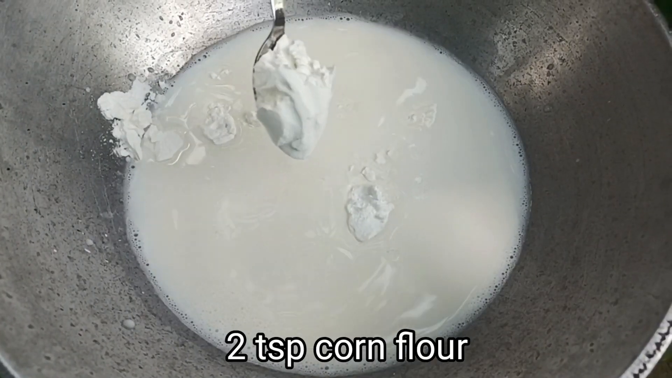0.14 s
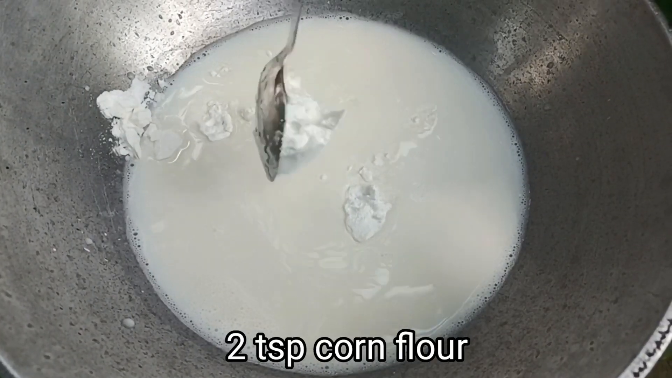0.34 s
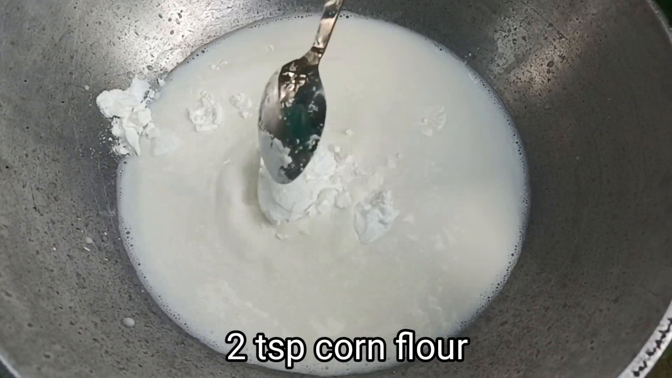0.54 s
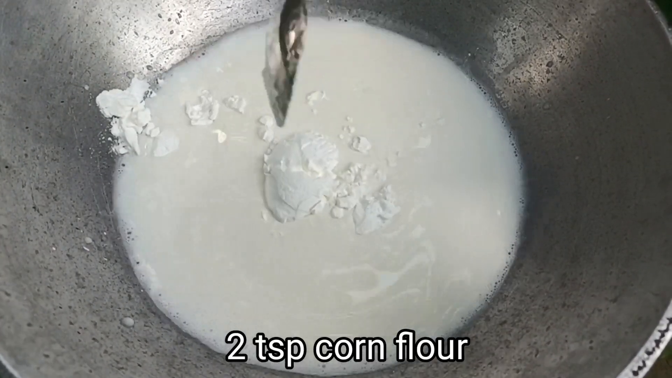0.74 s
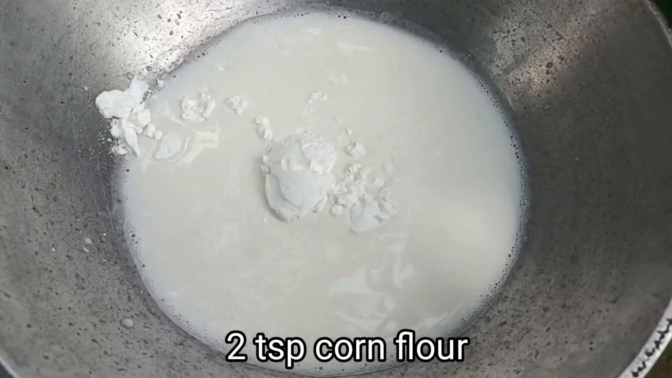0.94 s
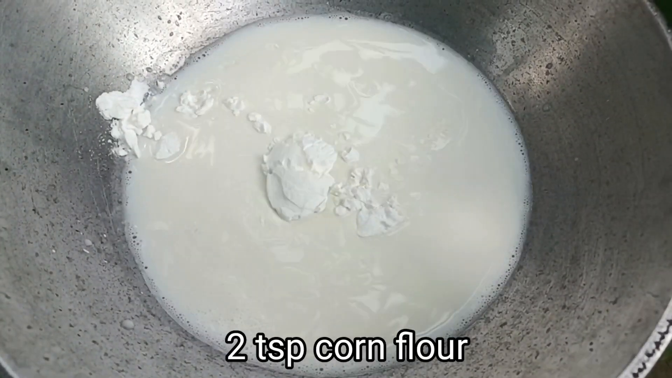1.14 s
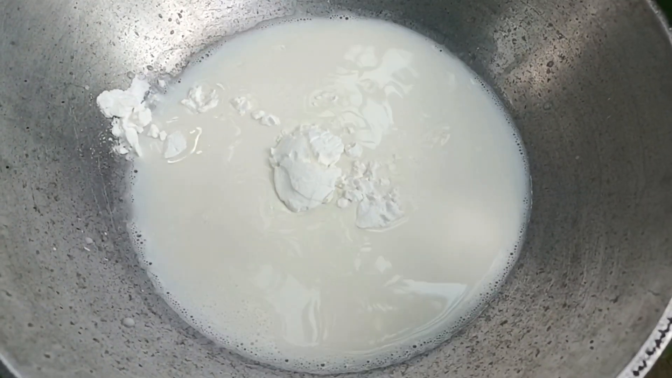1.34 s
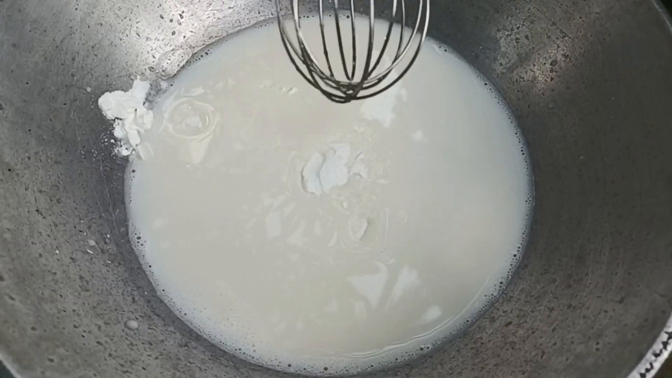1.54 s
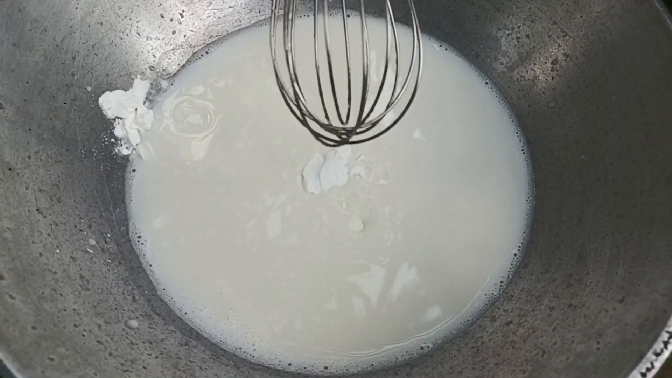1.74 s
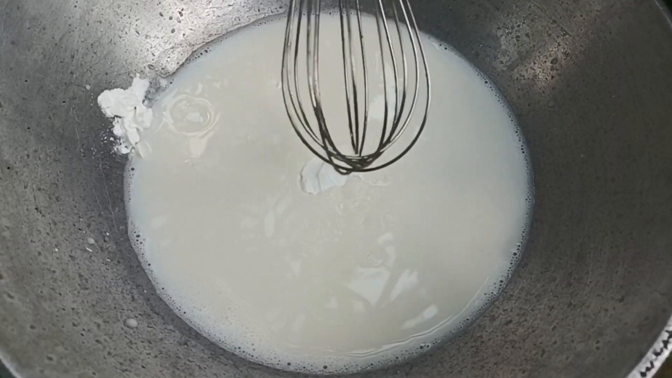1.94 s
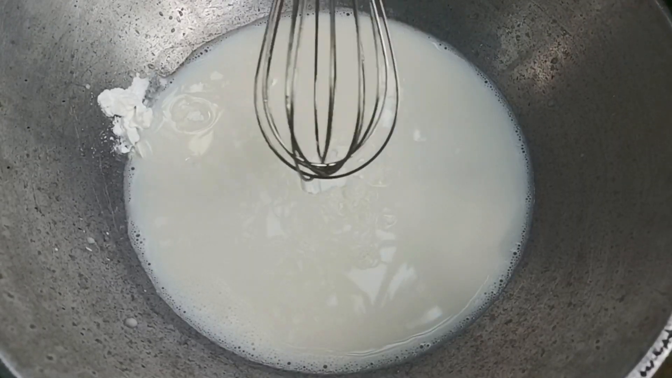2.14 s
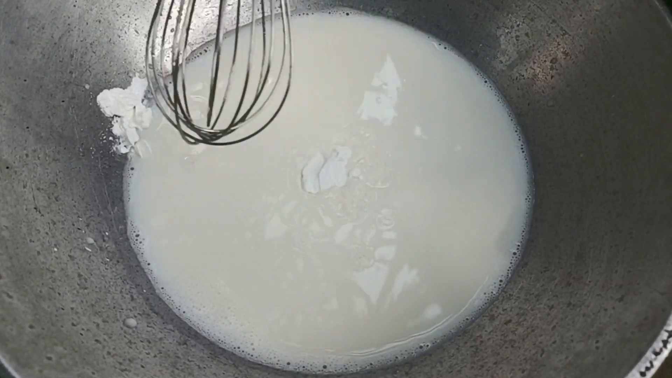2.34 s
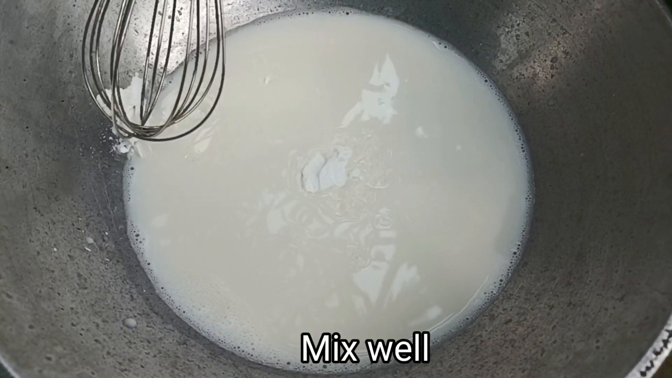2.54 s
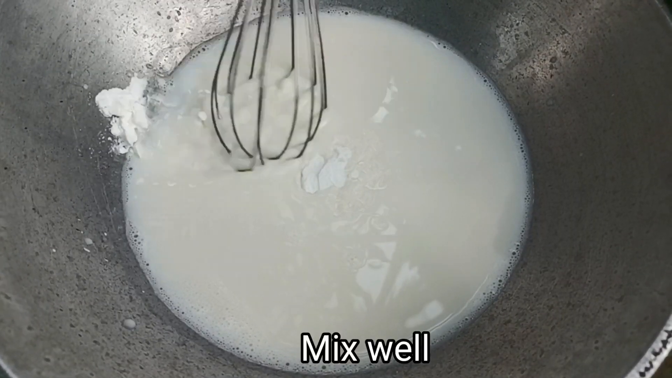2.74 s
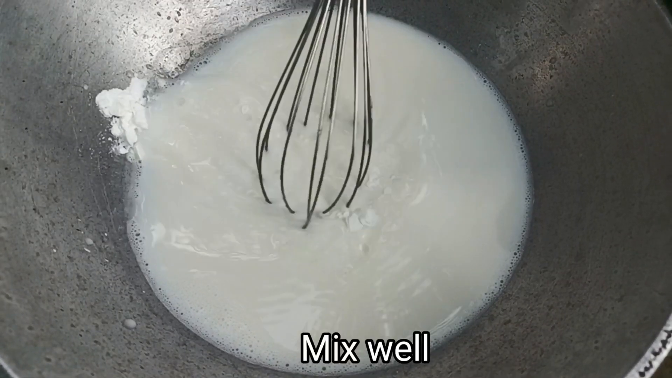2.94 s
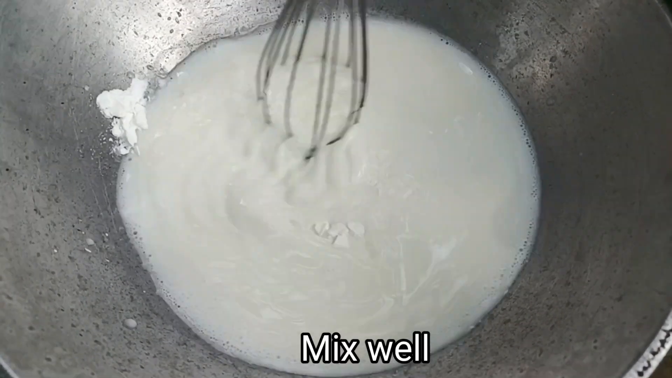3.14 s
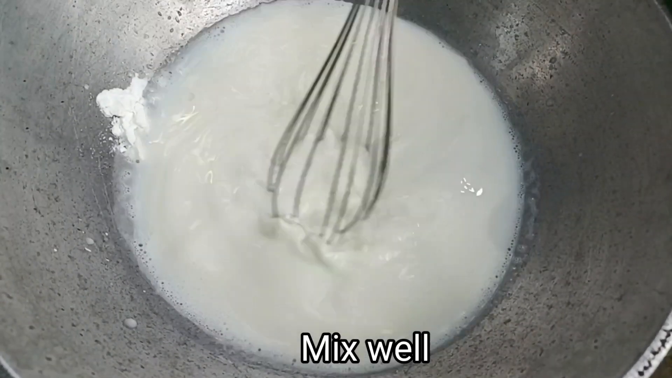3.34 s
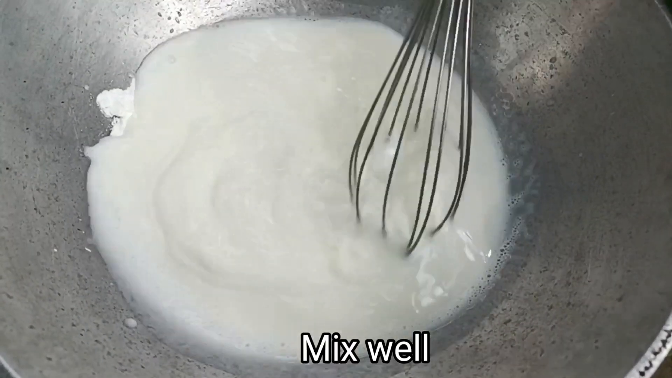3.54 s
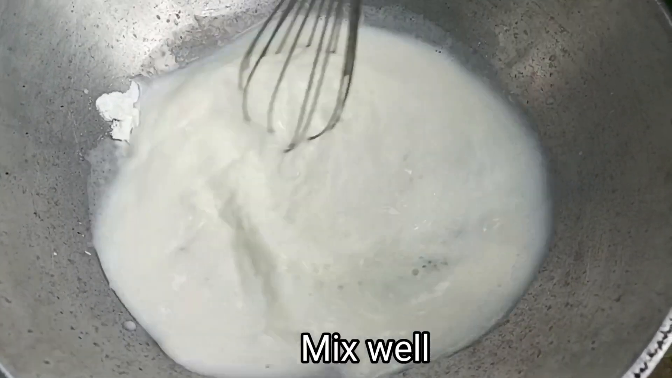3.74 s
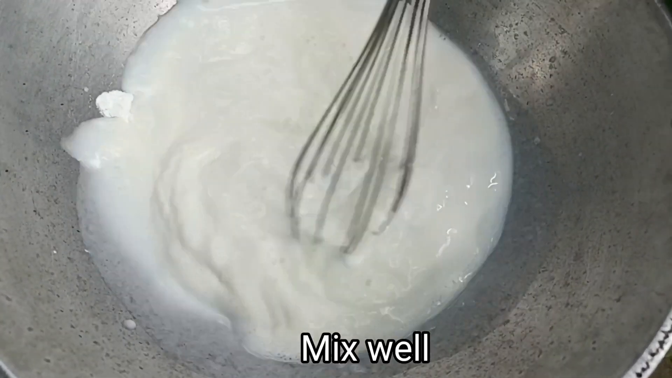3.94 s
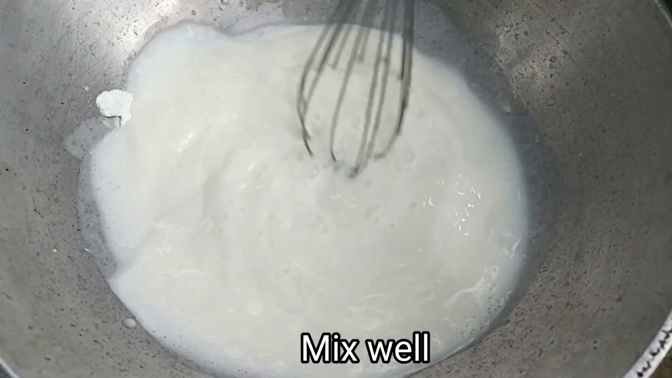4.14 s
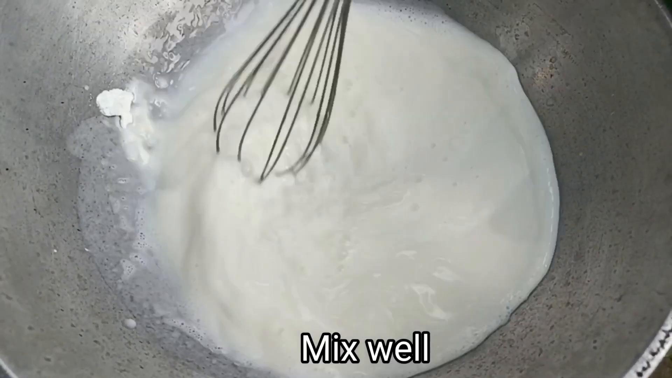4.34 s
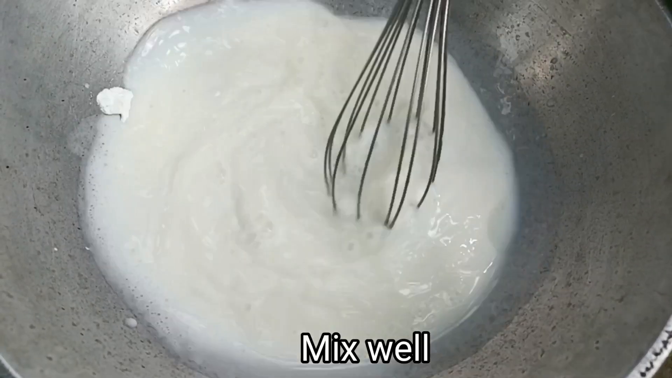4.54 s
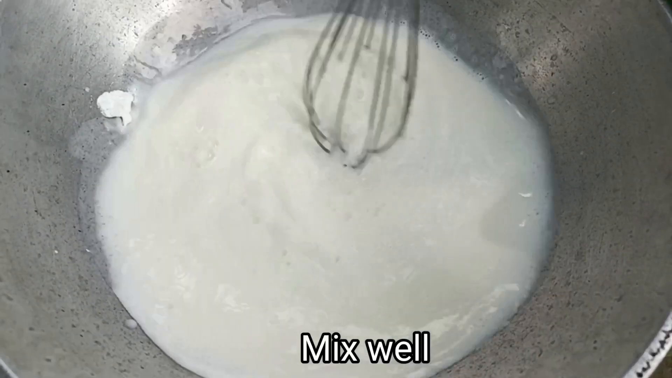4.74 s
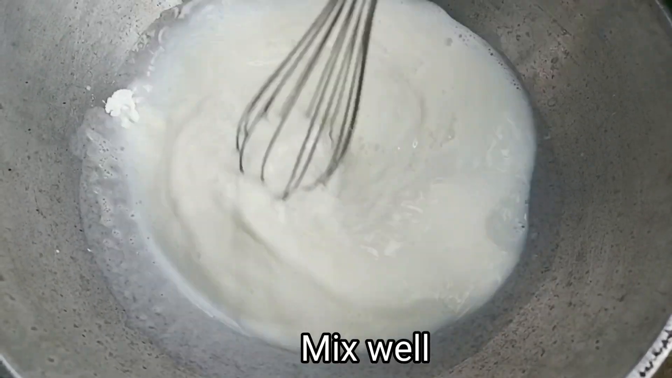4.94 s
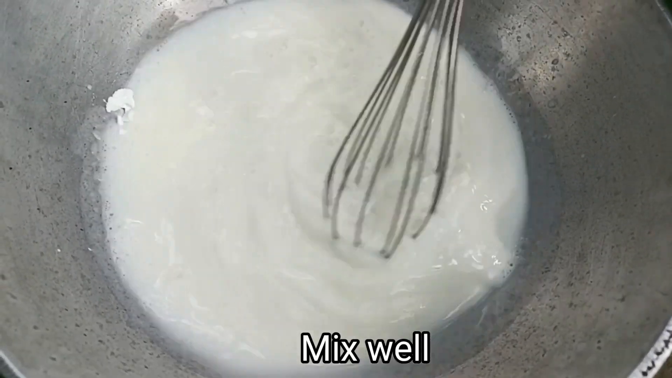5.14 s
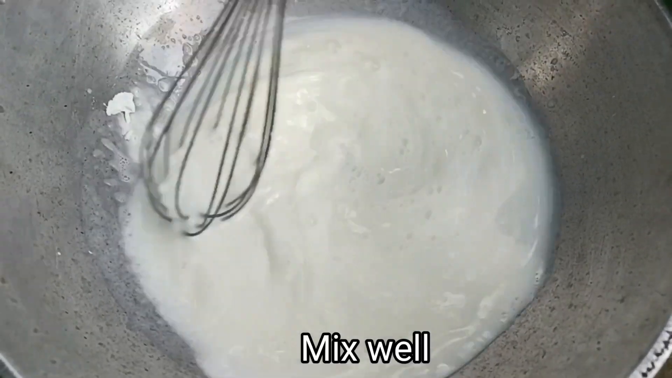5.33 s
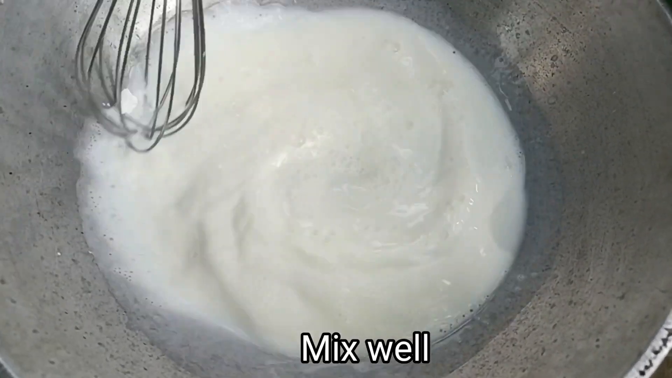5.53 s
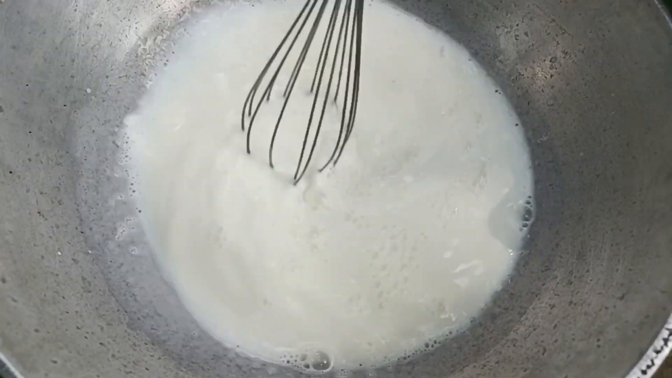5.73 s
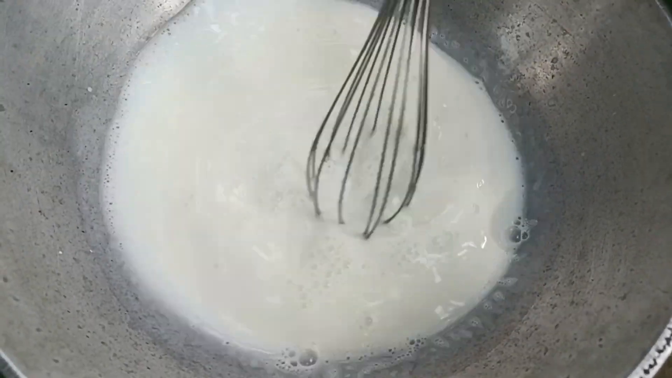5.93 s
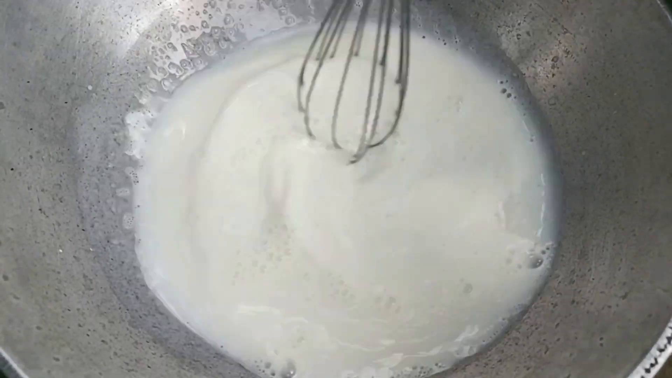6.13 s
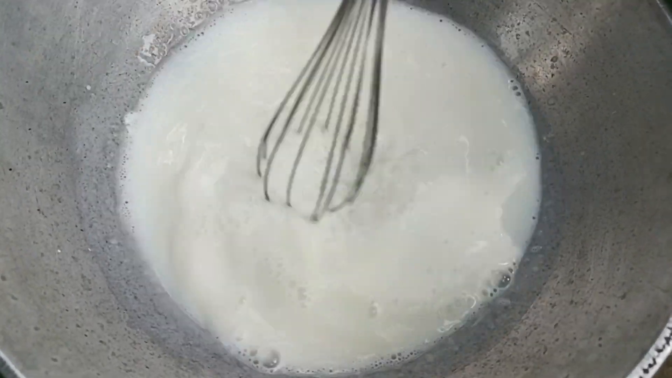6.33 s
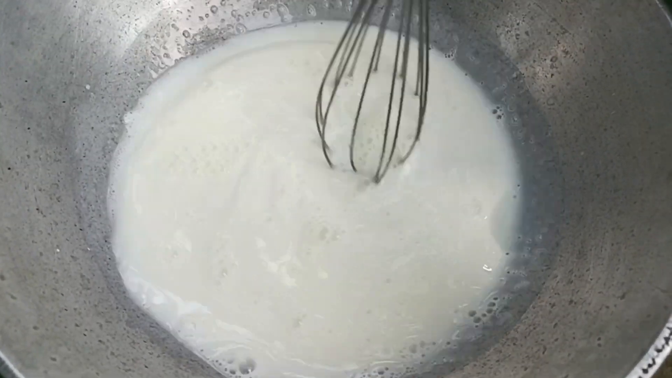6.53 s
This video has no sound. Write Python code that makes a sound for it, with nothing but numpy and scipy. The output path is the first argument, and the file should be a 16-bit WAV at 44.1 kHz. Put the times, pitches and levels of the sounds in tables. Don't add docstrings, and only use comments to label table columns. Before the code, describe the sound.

Quiet open-air ambience with chirring insects and a far crow, followed by fast metallic whisking, ringing steel, small watery gulps and a late dove coo.

```python
import sys
import numpy as np
from scipy import signal
from scipy.io import wavfile
from scipy.ndimage import uniform_filter1d

SR = 44100
rng = np.random.default_rng(int(sys.argv[2]) if len(sys.argv) > 2 else 0)


def nominal_scale(level):
    x = np.asarray(level, float) / 20
    return 10 ** x


def bounce(signal):
    frames = np.transpose(np.atleast_2d(signal))
    limited = np.clip(frames, -1, 1)
    pcm = np.round(limited * 32767).astype(np.int16)
    wavfile.write(sys.argv[1], SR, pcm)


N = 290178
TIME = np.arange(N) / SR

# centre_hz, width_hz, level_db
PAN_MODES = [(1726, 110, -8), (2067, 190.3, -1.5), (2570, 71, 0), (3040, 141, 1.5), (3692, 170, -1.5),
             (4240, 158, -6.5), (4530, 173, -5.5), (4920, 162, -7.5)]
# start_s, drag_db, first_mode_hz
HAND_STROKES = [(2.623, -46, 3260), (2.932, -44.5, 1680), (2.948, -40.5, 4570), (3.002, -34.5, 4600),
                (3.036, -42, 2562), (3.05, -42.5, 4000), (3.112, -44, 5070), (3.264, -45.5, 3790),
                (3.292, -40, 4570), (3.439, -31.0, 2510), (3.467, -38, 2500), (3.489, -39.5, 4450),
                (3.587, -32, 3580), (3.692, -37, 3200), (3.715, -42.5, 2570), (3.764, -44, 2270),
                (3.774, -40.5, 2120), (3.936, -40.5, 3600), (3.948, -28, 3740), (4.022, -36, 3530),
                (4.088, -39, 3550), (4.138, -42, 2310), (4.239, -32, 3657), (4.315, -40.5, 3700),
                (4.464, -38.5, 4560), (4.553, -32, 2775), (4.662, -35.5, 2580), (4.777, -37.5, 4520),
                (4.837, -36, 2810), (4.872, -32, 3692), (4.998, -35, 2535), (5.137, -33, 3564),
                (5.245, -48, 3300), (5.457, -42, 2663), (5.51, -47.5, 2580), (5.562, -47, 4350),
                (5.654, -33.5, 1756), (5.714, -38.5, 3820), (5.765, -39, 2020), (5.83, -44, 2660),
                (5.916, -39.5, 2540), (5.971, -35, 2580), (6.0, -40.5, 3400), (6.078, -39, 2520),
                (6.098, -36.5, 2610), (6.138, -39, 2398), (6.174, -42.5, 3630), (6.231, -40, 2580),
                (6.278, -32.5, 3030), (6.317, -37, 2620), (6.417, -33.5, 3727), (6.46, -38.5, 2590),
                (6.517, -35.5, 2550)]


def rms_one(x):
    return x / np.sqrt(np.mean(x ** 2) + 1e-20)


def in_time(rows):
    s, *columns = np.transpose(rows)
    return [np.interp(TIME, s, c) for c in columns]


def at_hz(points, hz):
    return np.interp(np.log(hz), np.log(np.array(points)[:, 0]), np.array(points)[:, 1])


def drift(rate):
    r = np.exp(-40 * np.pi * rate / SR)
    noise = rng.standard_normal(N // 20 + 2002)
    slow = signal.lfilter([1], [1, -2 * r, r * r], noise)[2000:]
    return np.interp(np.arange(N) / 20, np.arange(len(slow)), rms_one(slow))


def ring(clicks, hz, t60):
    r, w = nominal_scale(-60 / (t60 * SR)), 2 * np.pi * hz / SR
    return signal.lfilter([0, np.sin(w)], [1, -2 * r * np.cos(w), r * r], clicks + 1e-18)


def band(x, low_hz, high_hz):
    return signal.sosfilt(signal.butter(2, [low_hz, high_hz], "band", fs=SR, output="sos"), x)


def hiss(low_hz, high_hz):
    noise = rng.standard_normal((2, N))
    return rms_one(band(band(noise, low_hz, high_hz), low_hz, high_hz))


def grains(per_s, spread_db):
    sizes = nominal_scale(spread_db * np.minimum(rng.exponential(1, N), 5)) * rng.choice([-1, 1], N)
    return sizes * (rng.random(N) < per_s / SR)


def placed(x, pan_db, lag):
    return np.array([x * nominal_scale(pan_db / 2), np.roll(x, int(lag)) * nominal_scale(-pan_db / 2)])


def coloured(white, spectrum, patchy_db, patch_rate, alike):
    octaves = np.log2(spectrum[-1][0] / spectrum[0][0])
    edges = spectrum[0][0] * 2 ** np.arange(0, octaves + .01, 1 / 3)
    out = 0
    for k, (low, high) in enumerate(zip(edges, edges[1:])):
        mid, side = band(white[k % 2], low, high)
        hz = np.sqrt(low * high)
        c = np.clip(alike(hz), -1, 1)
        gain = nominal_scale(at_hz(spectrum, hz) + patchy_db * drift(patch_rate))
        out = out + gain * (np.sqrt(1 + c) * mid + np.sqrt(1 - c) * side * [[1], [-1]])
    return rms_one(out)


def air():
    # pitch_hz, level_db
    air_spectrum = [(55, -13), (120, 0.5), (280, -7), (620, -11), (900, -13), (3000, -10), (4300, -19.5),
                    (5300, -32.5), (6600, -9.5), (8300, -14)]
    # pitch_hz, likeness
    likeness = [(60, 0.44), (240, 0.85), (950, 0.0096), (15000, 0)]
    white = rng.standard_normal((2, 2, N))
    noise = nominal_scale(-71.5) * coloured(white, air_spectrum, 2.5, 4.0, lambda hz: at_hz(likeness, hz))
    return signal.sosfilt(signal.butter(8, 10500, fs=SR, output="sos"), noise)


def insect(per_s, hz, width_hz, noisy, uneven):
    count = np.floor(np.cumsum(per_s * (1 + 0.0073 * drift(2.2))) / SR)
    strokes = np.diff(count, prepend=0) * (1 + uneven * (-1) ** count)
    blur = (signal.lfilter([1], [1, -.994], strokes) + 9.4) * rng.standard_normal((2, N))
    song = rms_one(ring(placed(strokes, 0, 9), hz, .009)) + noisy * rms_one(blur)
    for _ in range(2):
        song = band(song, hz - width_hz, hz + width_hz)
    return rms_one(song)


def insects():
    # time_s, level_db
    trill_levels = [(0, -61), (1.03, -59), (1.05, -67), (1.25, -68.5), (1.7, -61), (2.56, -58.5),
                    (2.58, -67.5), (2.85, -65.5), (3.3, -60.5), (6.58, -60.5)]
    # top_s, level_db
    rasp_swells = [(0, -63.5), (.4, -59), (.72, -65.5), (1.0, -64), (1.41, -67.5), (1.579, -71.5),
                   (1.79, -60), (2.1, -68), (2.366, -69)]
    to_right = nominal_scale([[-2.5], [2.5]])
    trill = nominal_scale(in_time(trill_levels)[0]) * insect(140.8, 9827, 490, noisy=7.1, uneven=0.033)
    chirps_per_s, first_chirp_s = 8.22, .098
    beat = np.cos(2 * np.pi * chirps_per_s * (TIME - first_chirp_s))
    beat = np.clip(1.8 * beat + 1.5, .25, 1)
    chirp = nominal_scale(-63) * beat * insect(125, 8960, 475, noisy=3.7, uneven=0.022)
    sag_db_per_s = 80
    swell_db = np.max([db - sag_db_per_s * np.abs(TIME - s) for s, db in rasp_swells], axis=0)
    rasp = nominal_scale(swell_db + 2.0 * drift(18.0)) * hiss(4950, 5800)
    return (trill + chirp) * to_right + rasp


def call(rows, partials, rough, rough_hz):
    start, end = rows[0][0], rows[-1][0]
    on = (TIME > start - .002) & (TIME < end)
    pitch, level_db = (v[on] for v in in_time(rows))
    edge = np.clip(np.minimum(TIME[on] - start + 0.0039, end - TIME[on]) / 0.009, 0, 1)
    phase = 2 * np.pi * np.cumsum(pitch) / SR
    shake_in, shake_across = rough * drift(rough_hz)[on], rough * drift(rough_hz)[on]
    voice = 0
    for k, db in partials:
        voice = voice + nominal_scale(db) * ((1 + shake_in) * np.sin(k * phase) + shake_across * np.cos(k * phase))
    out = np.zeros(N)
    out[on] = nominal_scale(level_db) * edge * voice * np.sqrt(2 / (1 + 2 * rough ** 2))
    return out


def shaped(s, length, level_db, first_hz, last_hz):
    shape = [(0, 4.5), (0.18, 0), (1 - 0.18, 7.5), (1, 17)]   # (share of the length, dB below the top)
    return [(s + u * length, first_hz + u * (last_hz - first_hz), level_db - db) for u, db in shape]


def birds():
    # time_s, loudest_partial_hz, level_db
    caw = [(0.37, 1370, -67), (.4, 1367, -57), (0.45, 1293, -53), (.54, 1200, -71.5), (0.62, 1180, -83)]
    # multiple of the loudest partial, level_db
    throat = [(.5, -21.5), (1, 7), (1.5, 5.5), (2, 0), (2.4, -3.5), (3, -34)]
    # start_s, length_s, level_db, first_hz, last_hz
    hoarse = [(0.0, .36, -66, 2480, 2260), (.02, .3, -69, 2120, 2000), (2.3, .22, -76, 720, 700),
              (2.52, .2, -72, 740, 720), (0.0, .42, -63.5, 2310, 2140), (.5, .31, -59.5, 2020, 1920),
              (.61, .13, -70, 3100, 3080), (.63, .14, -63, 2460, 2380), (.66, .15, -67, 1510, 1460),
              (.71, .09, -67, 3520, 3460), (.75, .3, -61.5, 2000, 1880), (.8, .08, -75, 4000, 3980),
              (.91, .13, -67, 1550, 1530), (1.08, .15, -75, 3080, 3050), (1.38, .14, -59, 4940, 4770),
              (1.69, .22, -66, 6570, 6450), (1.91, .14, -65, 3110, 3050), (2.18, .1, -68, 3020, 3000),
              (2.16, .08, -69, 1890, 1950), (2.225, .06, -65, 1980, 2260), (2.25, .11, -62, 2700, 2440),
              (2.3, .09, -68, 3110, 3100), (2.335, .06, -66, 1780, 1710), (2.51, .06, -68, 1780, 2050),
              (2.55, .07, -66, 2120, 2260), (2.65, .2, -54, 1900, 1900), (2.71, .17, -57, 2330, 2200),
              (2.66, .21, -64, 1490, 1470), (2.83, .13, -55, 1800, 1640), (5.358, .075, -50, 3150, 3750),
              (5.36, .07, -53, 2800, 3050)]
    # start_s, length_s, level_db, first_hz, last_hz
    clear = [
        (.27, .09, -64, 3580, 3460),
        (1.47, .13, -71, 1212, 1228),
        (2.3, .16, -60, 527, 546),
        (2.55, .48, -61.5, 551, 553),
        (5.24, .18, -63.5, 755, 670),
        (1.7, .12, -68, 6600, 5250),
    ]
    crow = call(caw, throat, rough=1.3, rough_hz=110.0)
    throat_noise = rms_one(band(band(rng.standard_normal(N), 1160, 2900), 1250, 11000))
    opening = np.clip((TIME - .36) / 0.073, 0, 1) * (TIME < .62)
    crow += nominal_scale(in_time(caw)[1] + 4.0) * opening * throat_noise
    others = sum(call(shaped(*row), [(1, 0)], rough=2, rough_hz=65) for row in hoarse)
    others += sum(call(shaped(*row), [(1, 0)], rough=.4, rough_hz=27.0) for row in clear)
    out = placed(others, -7.0, -11) + placed(crow, -0.5, 10.9)
    for delay_s, db, pan_db in [(.023, -4, 4), (.047, -11, 1), (.081, -15.5, 2)]:
        out += nominal_scale(db) * placed(np.roll(others + crow, int(delay_s * SR)), pan_db, 41.9)
    return out


def contacts():
    # start_s, drag_db, mode_hz
    taps = [(2.641, -46, 3270), (2.736, -47, 2240), (2.98, -42.5, 2940), (3.079, -42.5, 2050),
            (3.187, -39.5, 3716), (3.351, -37, 4530), (3.381, -37, 4800), (3.405, -34.5, 3570),
            (3.479, -41, 4930), (3.542, -43.5, 2620), (3.774, -38.5, 2193), (3.829, -36.5, 2170),
            (3.865, -35.5, 4720), (3.884, -38, 3200), (4.053, -31.5, 3030), (4.09, -39.5, 3600),
            (4.707, -28, 3600), (4.782, -31.5, 3150), (5.056, -41, 3800), (5.576, -44, 5400),
            (5.593, -35, 4500), (5.742, -34.5, 3040), (5.83, -38, 2600), (6.436, -31, 3620)]
    # start_s, drag_db
    eases = [(2.653, -58), (2.713, -50), (2.768, -53.5), (2.882, -57), (3.247, -46), (3.323, -39.5),
             (3.522, -43), (3.749, -49), (3.902, -43), (3.982, -39.5), (4.066, -43), (4.121, -50),
             (4.178, -44), (4.209, -37), (4.33, -40), (4.42, -41.5), (4.495, -40), (4.631, -38.5),
             (4.728, -38), (4.811, -41.5), (4.945, -41.5), (4.978, -42), (5.031, -43), (5.091, -42.5),
             (5.124, -40), (5.254, -47), (5.269, -51), (5.319, -55), (5.362, -55), (5.538, -49),
             (5.601, -39), (5.68, -36), (5.787, -42), (5.889, -44.5), (6.028, -49), (6.064, -52),
             (6.193, -47), (6.37, -40.5), (6.493, -43), (6.54, -46.5)]
    # start_s, drag_db, mode_hz
    hard_landings = [(2.615, -39.5, 4220), (3.314, -31.5, 2525), (4.171, -32.5, 3360), (4.203, -33, 2630),
                     (4.394, -37, 2530), (4.968, -37.5, 2090), (5.075, -34, 2530), (5.106, -35.5, 4640),
                     (5.433, -36.5, 4580), (5.587, -41, 4570), (5.752, -30, 3080), (5.956, -31.5, 2580),
                     (6.042, -39.5, 2970), (6.086, -35, 2620), (6.569, -36, 3040)]
    tap_s, hop_s = .01, .05
    held = sorted(HAND_STROKES + hard_landings + [(s, db, 0) for s, db in eases])
    starts = np.transpose(held)[0]
    edges = np.append(starts, [(s, s + tap_s) for s, db, hz in taps])
    hops = np.arange(edges.min(), N / SR, hop_s)
    edges = np.append(edges, hops[np.abs(hops[:, None] - edges).min(axis=1) > hop_s / 3])
    odds = nominal_scale(np.transpose(PAN_MODES)[2])
    family = rng.choice(len(PAN_MODES), 1000, p=odds / odds.sum())
    place = rng.normal(0, .3, 1000)
    out = []
    for t in np.unique(edges[edges < N / SR].round(4)):
        s, db, first_hz = held[max(np.searchsorted(starts, t + 1e-4) - 1, 0)]
        for tap in taps:
            if tap[0] - 1e-4 < t < tap[0] + tap_s - 1e-4:
                s, db, first_hz = tap
        if first_hz > 0 and t < s + 1e-4:
            out.append((t, db, first_hz, db))
        else:
            hz, width = PAN_MODES[family[int(t * 100)]][:2]
            out.append((t, db, hz + width * place[int(t * 100)], db - 8))
    return out


def pressure(held_db):
    bite_db, bite_s, let_go_db_per_s = 3.5, .007, 1400
    landings = np.sort([0] + [row[0] for row in HAND_STROKES])
    age = TIME - landings[np.searchsorted(landings, TIME, side="right") - 1]
    db = held_db + bite_db * (np.exp(-age / bite_s) - .3)
    return np.maximum.accumulate(db + let_go_db_per_s * TIME) - let_go_db_per_s * TIME


def pan_ring(contact):
    out, ticks = 0, grains(2000, spread_db=-0.5)
    places = np.array([-1.433, -0.655, -0.237, -0.09, 0.26, 0.725, 1.294])
    for hz, width, level_db in PAN_MODES:
        for place in places + rng.normal(0, 0.14, 7):
            share = nominal_scale(5.5 * (rng.standard_normal(size=400)[contact] + drift(18.4)))
            mode = rms_one(ring(ticks * share, hz + place * width, .075))
            mode = placed(mode, rng.normal(0, 3), rng.integers(-12, 12))
            out = out + nominal_scale(level_db) * np.sqrt(width) * mode
    return rms_one(out)


def favoured_modes(spells, t60):
    out, ticks, tail = np.zeros((2, N + SR)), grains(1200, spread_db=3.0), SR // 8
    starts = [round(row[0] * SR) for row in spells] + [N]
    lags = rng.integers(0, 14, size=400)
    for (s, _, hz, drag_db), a, b, late in zip(spells, starts, starts[1:], lags):
        drive = np.append(ticks[a:b], np.zeros(tail))
        drive[0] += 8.0
        mode = ring(drive, hz, t60)
        mode *= nominal_scale(drag_db) / np.sqrt(np.mean(mode[:b - a] ** 2) + 1e-12)
        out[0, a:b + tail] += mode
        out[1, a + late:b + tail + late] += mode
    return out[:, :N]


def singing(stroke, t60):
    # start_s, length_s, level_db, pitch_hz
    sung_modes = [(2.905, 0.1, -52.5, 1690), (2.994, 0.081, -43, 2535), (5.56, 0.044, -45.5, 5300),
                  (3.253, 0.24, -48, 1525), (3.274, 0.11, -46, 4460), (3.306, 0.12, -49, 2517),
                  (3.759, 0.098, -43.5, 2192), (3.943, 0.042, -34.5, 3580), (3.944, 0.047, -39, 3090),
                  (4.084, 0.16, -47.5, 4484), (4.087, 0.058, -49.5, 2420), (5.548, 0.0565, -39.5, 4550),
                  (4.168, 0.079, -43, 2540), (4.245, 0.14, -42, 3564.0), (4.389, 0.059, -44, 2543),
                  (4.405, 0.25, -51.5, 1970), (4.65, 0.065, -36.5, 2554), (4.656, 0.064, -40.5, 2023),
                  (4.7, 0.087, -46, 3740), (4.731, 0.064, -47, 2560), (4.87, 0.086, -49, 3720),
                  (4.927, 0.067, -44, 4730), (4.95, 0.057, -34.5, 2150), (4.96, 0.058, -41.5, 3193),
                  (4.99, 0.12, -46.5, 5010), (4.991, 0.085, -37.5, 2585), (5.065, 0.046, -48, 4560),
                  (5.092, 0.063, -38, 4520), (5.14, 0.092, -44, 3590), (5.168, 0.2, -57.5, 1724),
                  (5.172, 0.088, -54, 3270), (5.344, 0.088, -64.5, 1690), (5.422, 0.14, -48.5, 2650),
                  (5.472, 0.12, -61, 4420), (5.517, 0.098, -55, 5200), (5.694, 0.073, -39.5, 3067.0),
                  (5.704, 0.09, -40.5, 2045), (5.764, 0.081, -46.5, 3590), (5.77, 0.2, -50.5, 4680),
                  (5.772, 0.11, -49, 3290), (5.832, 0.081, -43.5, 2727), (5.871, 0.13, -46.5, 2070),
                  (5.899, 0.079, -45.5, 2570.0), (6.021, 0.14, -43, 2586), (6.084, 0.23, -53, 1948.0),
                  (6.139, 0.3, -50.5, 2570), (6.403, 0.15, -48.5, 2527), (6.407, 0.099, -47.5, 4970),
                  (6.428, 0.13, -46.5, 3599.0), (6.495, 0.052, -44, 2030)]
    late_s, window = .015, SR // 3
    out, stroke = np.zeros((2, N + SR)), np.append(stroke, np.zeros(SR))
    for s, length, level_db, hz in sung_modes:
        a, n = round((s + late_s) * SR), round((length - 2 * late_s) * SR)
        rubbing = (np.arange(window) < n) * stroke[a:a + window] ** 1.08
        drive = rng.standard_normal((3, window)) * rubbing
        modes = ring(drive[0] + drive[1:], hz, t60)
        out[:, a:a + window] += nominal_scale(level_db) * modes / np.sqrt(np.mean(modes[:, :n] ** 2))
    return out[:, :N]


def wires(t60):
    # pitch_hz, level_db
    wire_spectrum = [(5200, -0.5), (6500, -7), (8500, -12.5), (11000, -14.5), (13000, -26), (15000, -18)]
    born, dealt, out = grains(1500, spread_db=1.0), rng.integers(0, 40, N), 0
    for k, hz in enumerate(np.linspace(5200, 15200, 40) + rng.uniform(-80, 80, 40)):
        flare = nominal_scale(at_hz(wire_spectrum, hz) + 2.3 * drift(10.5))
        pan_db = at_hz([(5000, 6), (10000, -7)], hz) + rng.normal(0, 4)
        out = out + placed(ring(born * (dealt == k) * flare, hz, t60), pan_db, rng.integers(-40, 40))
    return rms_one(out)


def knocks():
    # start_s, peak_db
    cracks = [(2.614, -35), (3.02, -28), (3.439, -37), (3.8902, -31), (3.95, -32), (4.156, -36),
              (4.558, -52), (4.605, -31.5), (4.714, -40), (5.002, -28.5), (5.085, -47), (5.1396, -33.5),
              (5.177, -28.5), (5.2686, -51), (5.3401, -51), (5.4344, -23.5), (5.565, -38), (5.639, -33.5),
              (5.754, -33), (3.656, -28.5), (4.243, -51), (4.838, -37), (4.922, -34), (5.195, -29)]
    out, t = np.zeros((2, N)), TIME[:SR // 10]
    for s, peak_db in cracks:
        crack = band(rng.standard_normal((2, len(t))), 2400, 6260) * nominal_scale(peak_db - 60 * t / 0.065)
        spark = band(rng.standard_normal((2, len(t))), 10000, 15000)
        crack += spark * nominal_scale(peak_db - 12 - 60 * t / 0.03)
        i = round(s * SR)
        out[:, i:i + len(t)] += crack[:, :N - i]
    return out


def gurgle(centre_hz):
    born = grains(700, spread_db=1.0) * nominal_scale(3.85 * drift(10.4))
    dealt, out = rng.integers(0, 16, N), 0
    for k, hz in enumerate(np.geomspace(370, 1300, 16)):
        near = nominal_scale(-14.0 * np.log2(hz / centre_hz) ** 2 + 6.4 * drift(9.5))
        bubbles = ring(born * (dealt == k), hz, 67.0 / hz)
        out = out + near * placed(bubbles, rng.normal(-0.5, 0.13), rng.integers(-8, 8))
    out = rms_one(out) + nominal_scale(-8.5) * hiss(395, 990)
    return rms_one(band(band(out, 447, 1324), 285, 1370))


def whisk():
    # time_s, slosh_db at medium drag, slosh_hz
    stir = [(2.6, -38.5, 710), (2.67, -80, 686), (2.92, -59.5, 650), (3.03, -48.5, 710), (3.25, -75, 645),
            (3.36, -58.5, 700), (3.75, -53.5, 930), (3.9, -56, 710), (4.17, -60.5, 513.7),
            (4.4, -50.5, 980), (4.7, -52.5, 920), (4.95, -59, 615), (5.15, -53.5, 510), (5.3, -68, 730.8),
            (5.68, -45.5, 1060), (5.8, -60, 716.7), (6.2, -60.5, 646), (6.5, -61, 660)]
    # pitch_hz, level_db
    rub_spectrum = [(1300, -23), (1700, -43), (2200, -7), (4600, 10), (5400, -42), (6400, -16), (9500, -7)]
    slosh_db, slosh_hz = in_time(stir)
    spells = contacts()
    s, drag_db = np.transpose(spells)[:2]
    contact = np.searchsorted(s, TIME)
    held_db = np.append(-120, drag_db)[contact]
    stroke = nominal_scale(pressure(held_db) + 1.8 * drift(70.0))
    stroke = uniform_filter1d(stroke, size=50)
    clicks = np.array([grains(3000, spread_db=2.0) for _ in range(4)]).reshape(2, 2, N)
    rub = coloured(clicks, rub_spectrum, 1.0, 3.0, lambda hz: .1)
    body = nominal_scale(-10) * rub + pan_ring(contact)
    body /= uniform_filter1d(np.mean(body ** 2, axis=0), size=600) ** .43 + 1e-9
    steel = nominal_scale(-2) * stroke * rms_one(body)
    steel += nominal_scale(-9) * favoured_modes(spells, t60=.07) + singing(stroke, t60=.07)
    steel = signal.sosfilt(signal.cheby2(6, 36, 1200, "high", fs=SR, output="sos"), steel)
    steel = signal.sosfilt(signal.butter(4, 9500, fs=SR, output="sos"), steel)
    wet_spray = nominal_scale(-40) * hiss(10500, 15500)
    bright = stroke * (nominal_scale(-16) * wires(t60=0.054) + wet_spray) + knocks() * nominal_scale([[-2.5], [2.5]])
    liquid = nominal_scale(slosh_db + 17.0) * np.sqrt(stroke) * (contact > 0) * gurgle(slosh_hz)
    return steel * nominal_scale([[2.5], [-2.5]]) + bright + liquid


def clinks():
    # start_s, peak_db, pitch_hz
    touches = [(2.6455, -32, 3340), (2.7357, -37, 1940), (2.98, -29, 4480), (3.4805, -21.5, 4780),
               (3.5438, -27, 2626), (3.5903, -18.5, 2610), (3.7768, -21.5, 2225), (4.0896, -24, 3670),
               (4.8614, -25.5, 2240), (4.9671, -30, 2110), (5.077, -22.5, 2570), (5.1066, -24, 4540),
               (5.4415, -23, 4630), (5.661, -24, 1980), (5.6744, -26, 4780), (5.9597, -26, 2560),
               (6.0853, -23, 2590), (6.4366, -23, 3730), (6.5146, -28, 2530)]
    out, t = np.zeros((2, N)), TIME[:SR // 10]
    decay = np.minimum(t / 0.0016, 1) * nominal_scale(-60 * t / 0.028)
    for s, peak_db, hz in touches:
        snap = band(rng.standard_normal((2, len(t))) * nominal_scale(-4 - 60 * t / .012), 1200, 5500)
        neighbour_hz = hz * rng.uniform(1.15, 1.8)
        modes = np.sin(2 * np.pi * hz * t) + 0.26 * np.sin(2 * np.pi * neighbour_hz * t)
        i = round(s * SR)
        out[:, i:i + len(t)] += (nominal_scale(peak_db - 6) * (snap + modes * decay))[:, :N - i]
    return out * nominal_scale([[2.5], [-2.5]])


def thumps():
    # start_s, peak_db
    rocks = [(3.019, -52.5), (3.199, -51.5), (3.506, -46.5), (4.567, -40.5), (4.92, -57), (5.177, -47.5),
             (5.45, -41.5)]
    # start_s, peak_db, pitch_hz
    nudges = [
        (4.917, -47.5, 179),
        (5.151, -48.5, 115),
        (5.52, -46.5, 132),
        (5.761, -70, 65),
        (6.348, -44, 74),
    ]
    pushes = [(s, db, 277, 3.0, -2.1) for s, db in rocks] + [(*nudge, .9, 8) for nudge in nudges]
    out = np.zeros((2, N))
    for s, peak_db, hz, turns, pan_db in pushes:
        u = np.clip((TIME - s) * hz / turns, 0, 30)
        push = u * np.exp(-u) * np.sin(2 * np.pi * hz * (TIME - s))
        out += placed(nominal_scale(peak_db - 3.5) * push, pan_db, 0)
    return out


def gulps():
    # start_s, length_s, level_db, first_hz, last_hz
    pockets = [(3.29, .06, -58, 560, 640), (3.37, .09, -53, 1400, 1600), (3.51, .07, -60, 1030, 1080),
               (3.733, .05, -50, 800, 960), (3.825, .035, -51, 560, 700), (4.1, .1, -58, 1520, 1480),
               (4.35, .15, -52, 880, 1020), (4.43, .06, -57, 540, 580), (4.66, .05, -54, 880, 980),
               (5.64, .08, -53, 800, 1000)]
    voices = sum(call(shaped(*row), [(1, 0)], rough=1.0, rough_hz=40.0) for row in pockets)
    return placed(voices, -1.6, -8.5)


def dove():
    # time_s, pitch_hz, level_db
    coo = [
        (5.9, 695, -55),
        (5.93, 775, -52.5),
        (6.09, 750, -49.5),
        (6.25, 728, -56.5),
        (6.32, 724, -61),
    ]
    throbs_per_s, throb_top_s, depth = 37.8, 6.091, .75
    throb = np.cos(2 * np.pi * throbs_per_s * (TIME - throb_top_s))
    throb = 1 + depth * throb * np.clip((TIME - 5.94) / .06, 0, 1)
    return placed(call(coo, [(1, 0)], rough=.2, rough_hz=27.0) * throb, -5.0, -14)


def scene():
    return air() + insects() + birds() + whisk() + clinks() + thumps() + gulps() + dove()


def roll_off(x):
    return signal.sosfilt(signal.butter(12, 16190, fs=SR, output="sos"), x)


def record(dry):
    rumble = band(rng.standard_normal((2, N)), 22, 90)
    rumble = rumble * nominal_scale(-62.5 + 4.6 * drift(1.9)) * nominal_scale([[0], [-13]])
    top = signal.cheby2(10, 50, 15900, fs=SR, output="sos")
    mix = signal.sosfilt(top, dry + rumble)
    return roll_off(mix)


dry = scene()
out = record(dry)
bounce(out)
```